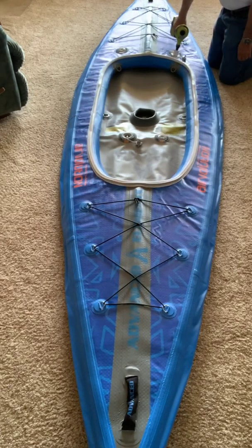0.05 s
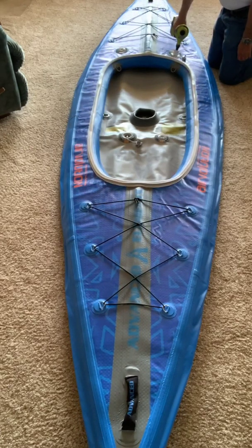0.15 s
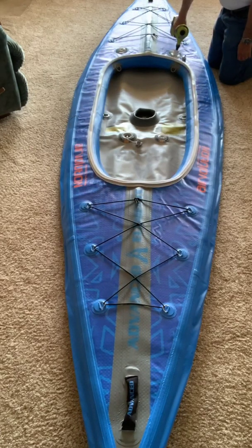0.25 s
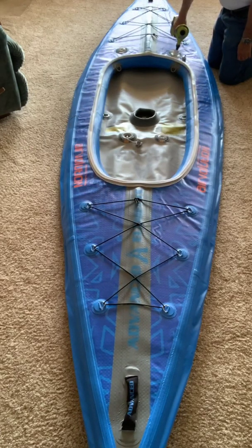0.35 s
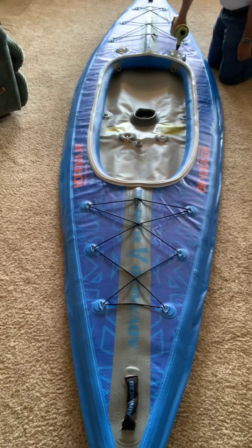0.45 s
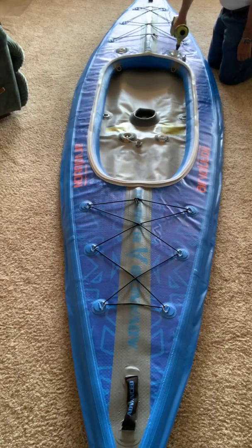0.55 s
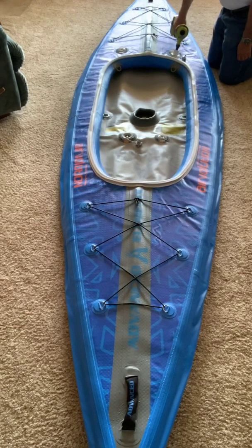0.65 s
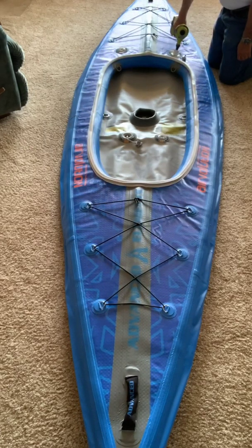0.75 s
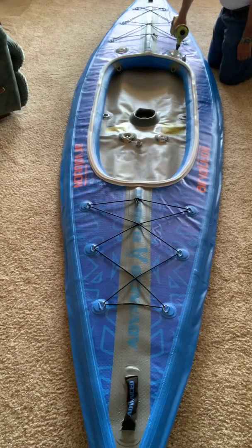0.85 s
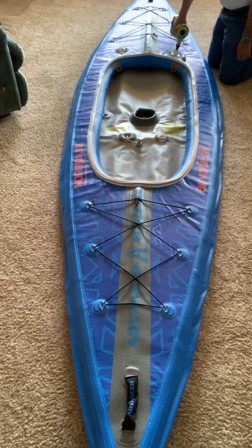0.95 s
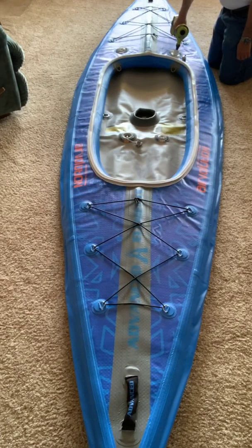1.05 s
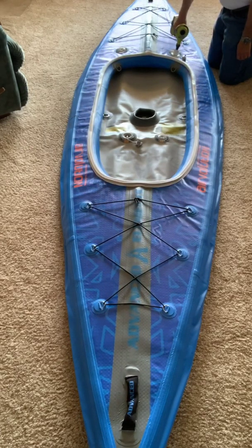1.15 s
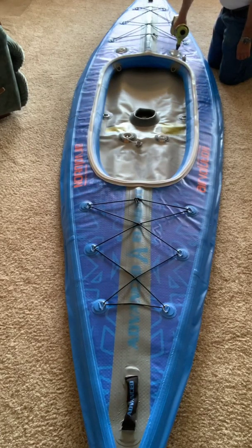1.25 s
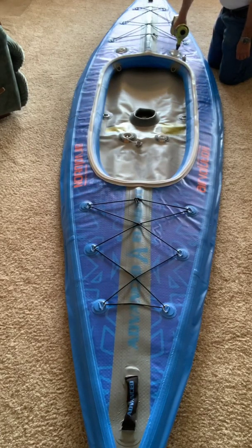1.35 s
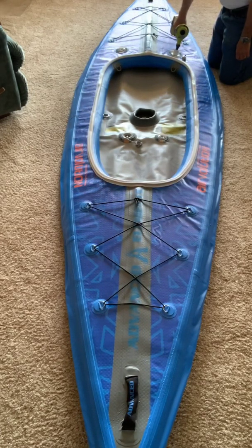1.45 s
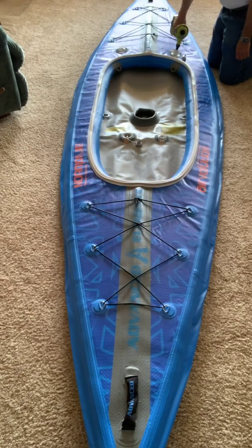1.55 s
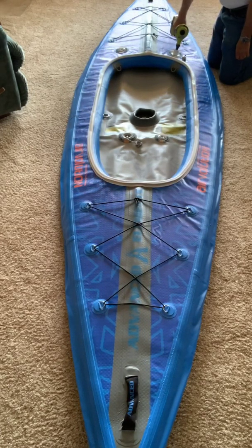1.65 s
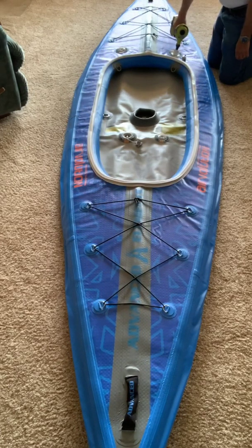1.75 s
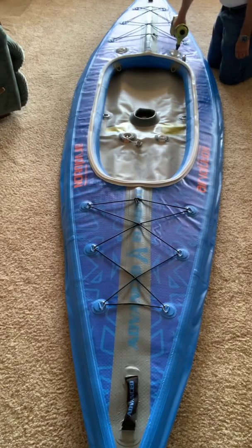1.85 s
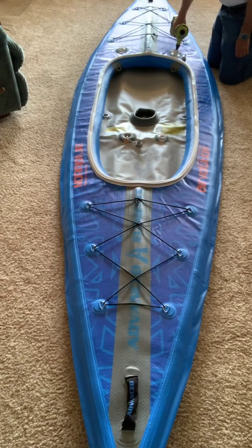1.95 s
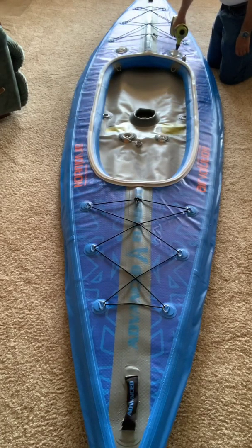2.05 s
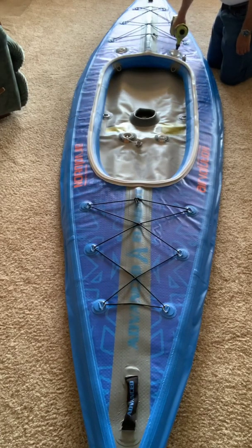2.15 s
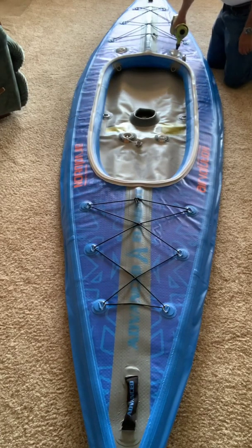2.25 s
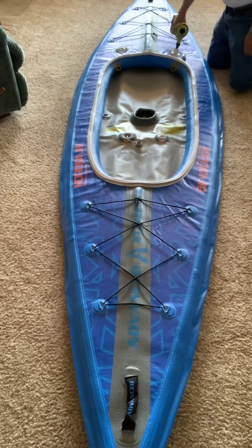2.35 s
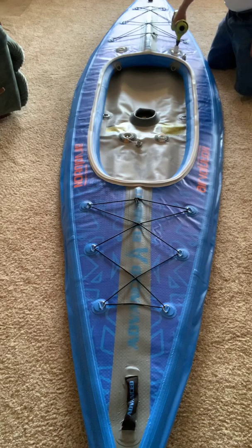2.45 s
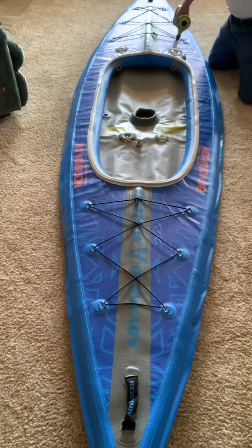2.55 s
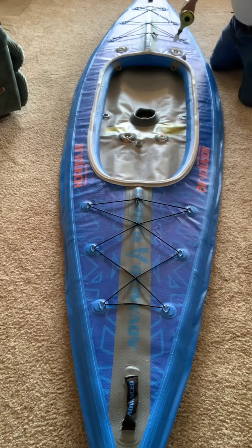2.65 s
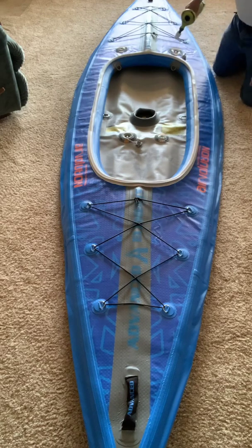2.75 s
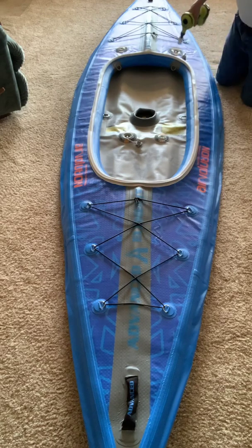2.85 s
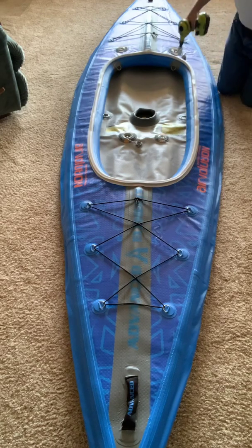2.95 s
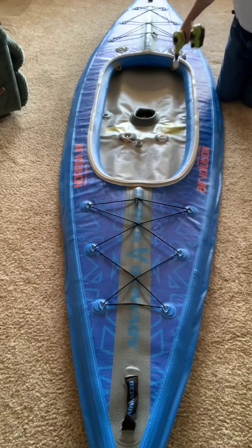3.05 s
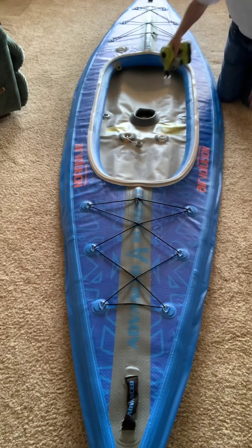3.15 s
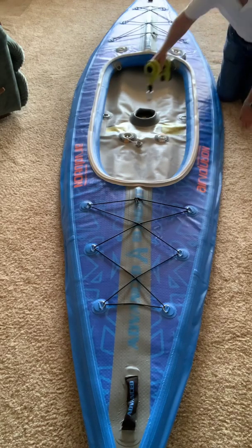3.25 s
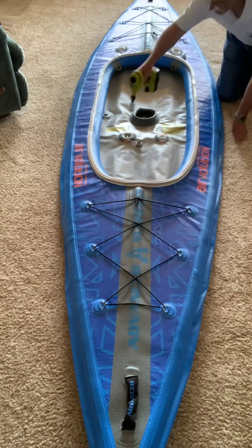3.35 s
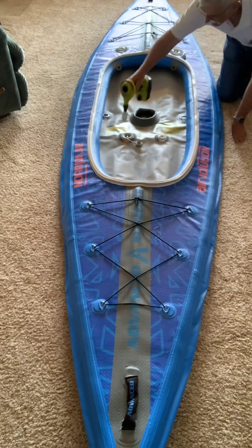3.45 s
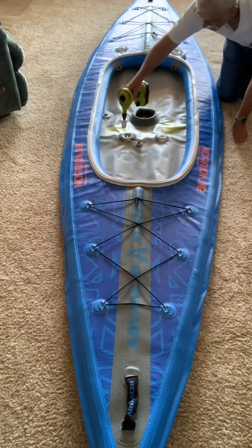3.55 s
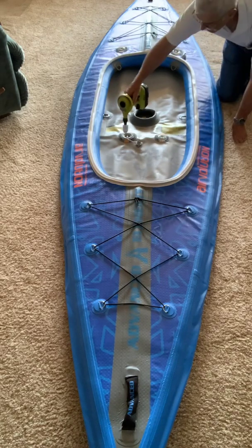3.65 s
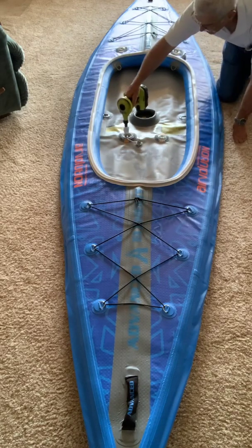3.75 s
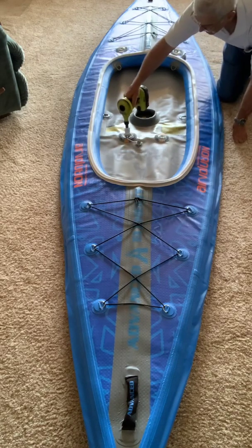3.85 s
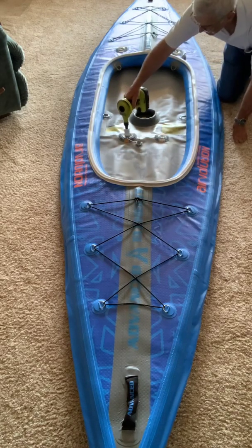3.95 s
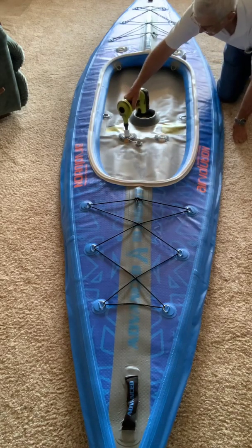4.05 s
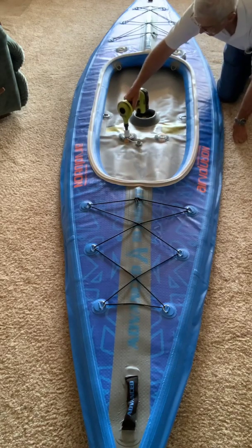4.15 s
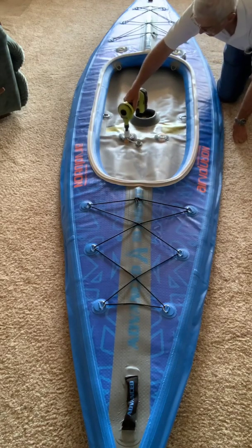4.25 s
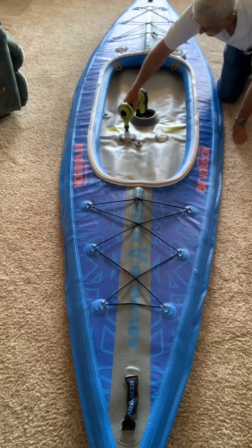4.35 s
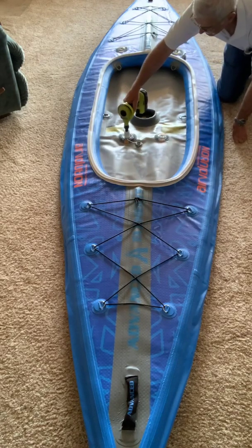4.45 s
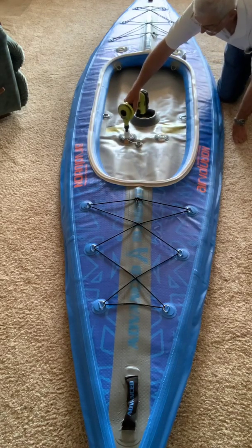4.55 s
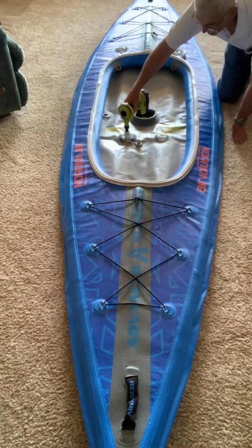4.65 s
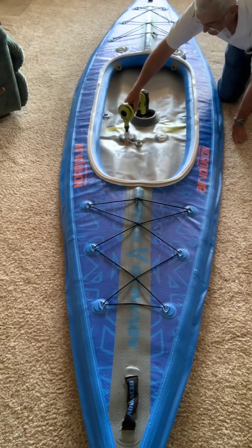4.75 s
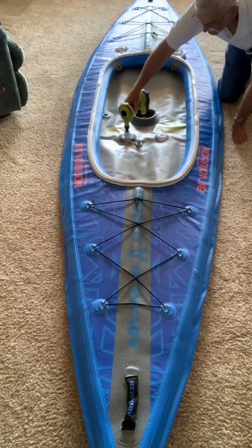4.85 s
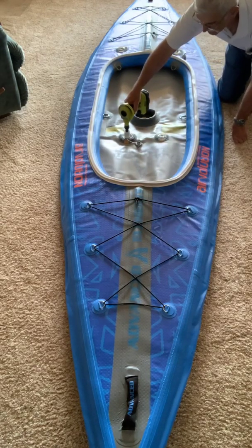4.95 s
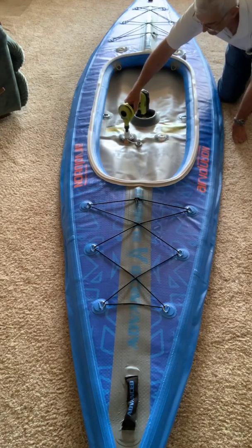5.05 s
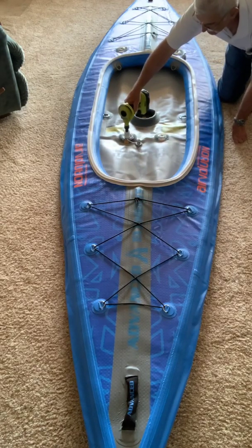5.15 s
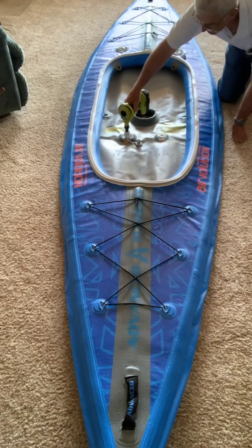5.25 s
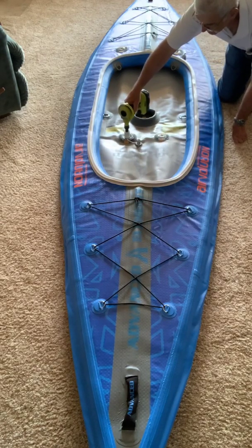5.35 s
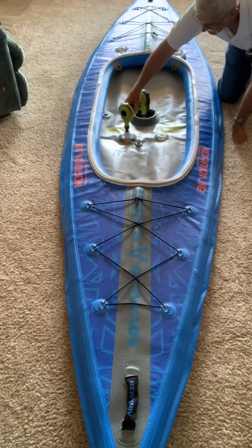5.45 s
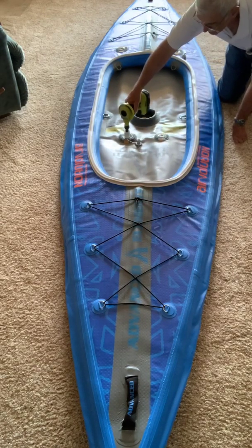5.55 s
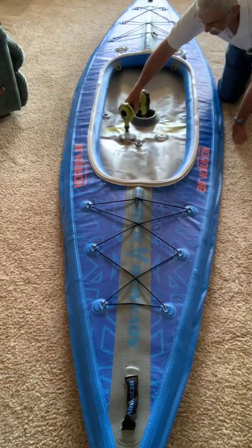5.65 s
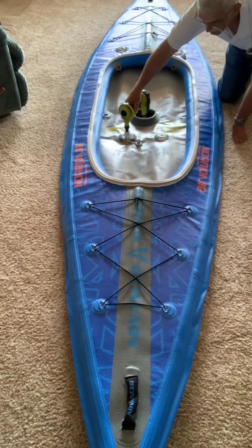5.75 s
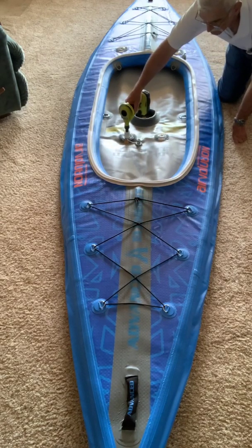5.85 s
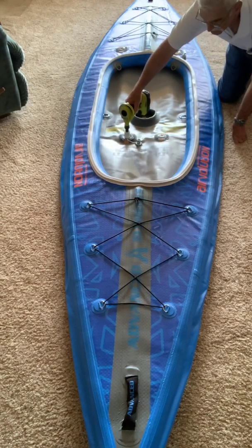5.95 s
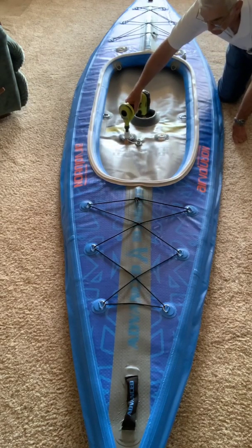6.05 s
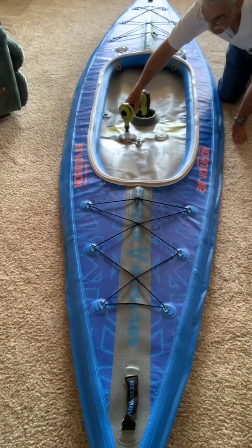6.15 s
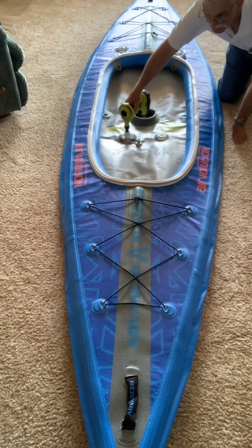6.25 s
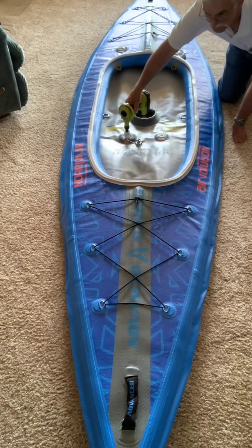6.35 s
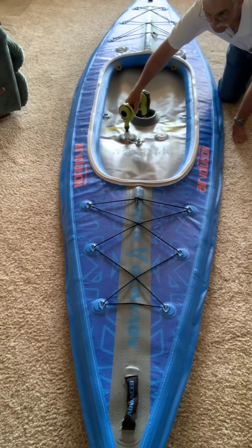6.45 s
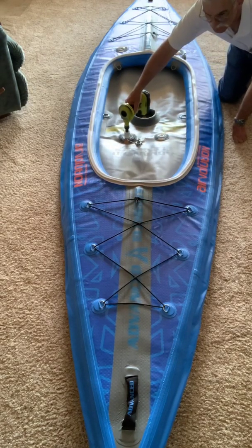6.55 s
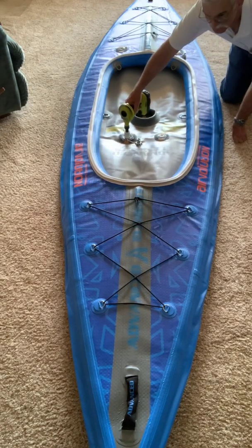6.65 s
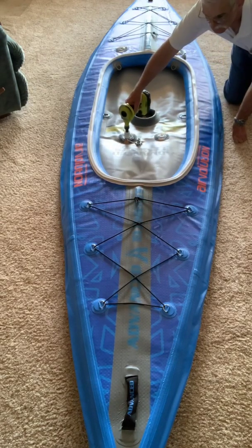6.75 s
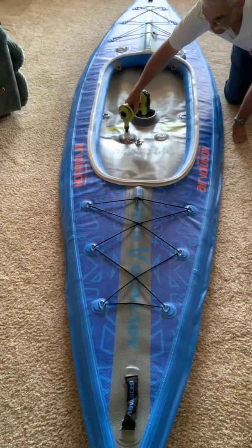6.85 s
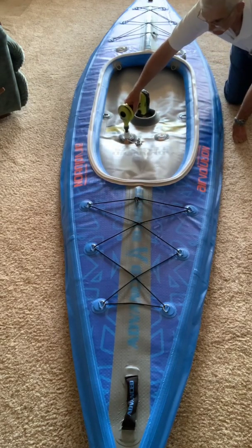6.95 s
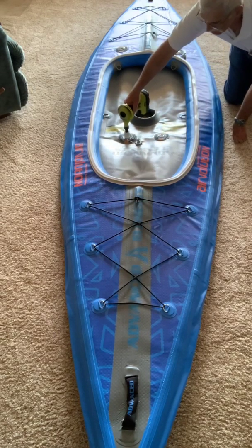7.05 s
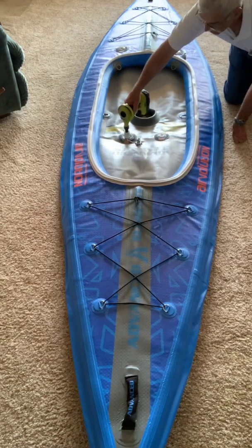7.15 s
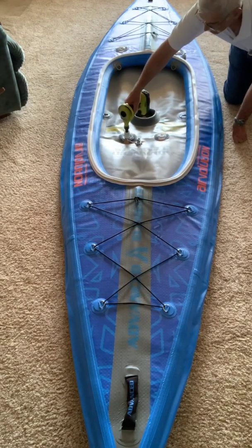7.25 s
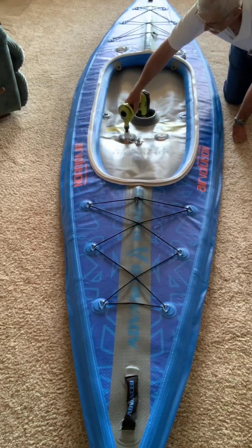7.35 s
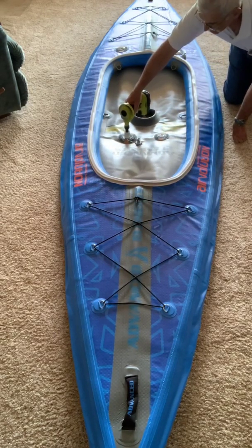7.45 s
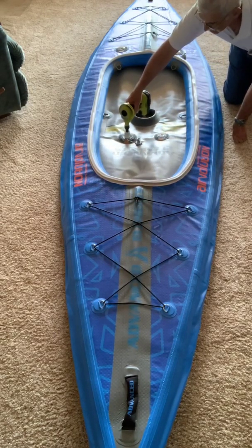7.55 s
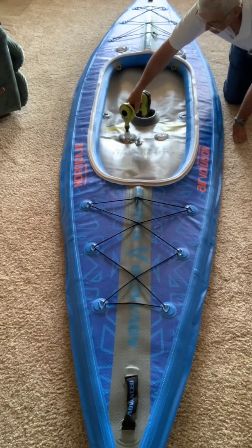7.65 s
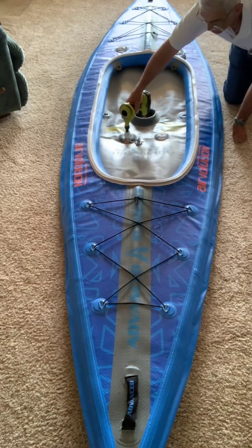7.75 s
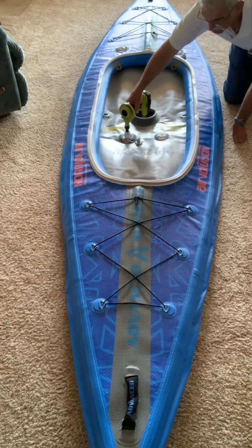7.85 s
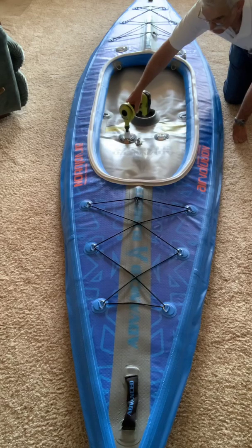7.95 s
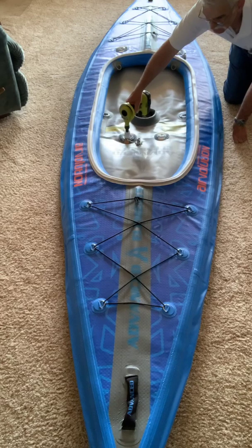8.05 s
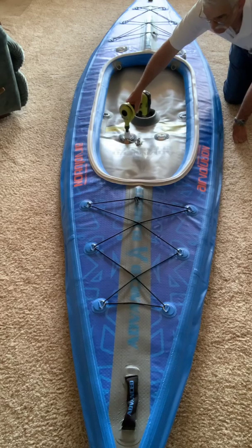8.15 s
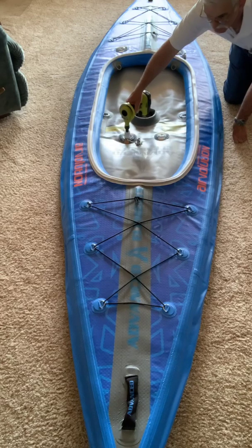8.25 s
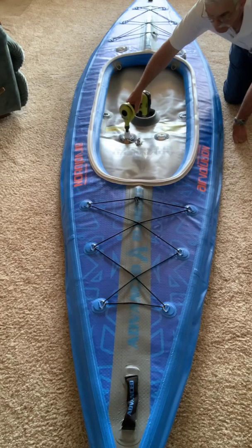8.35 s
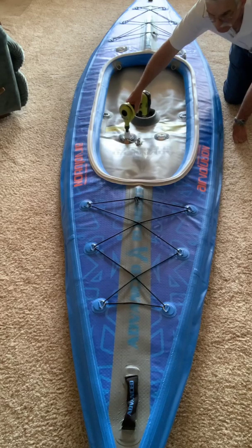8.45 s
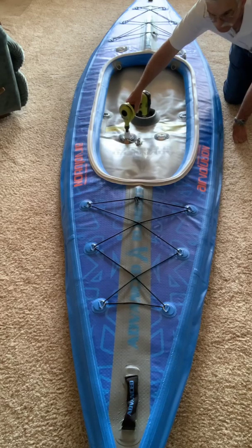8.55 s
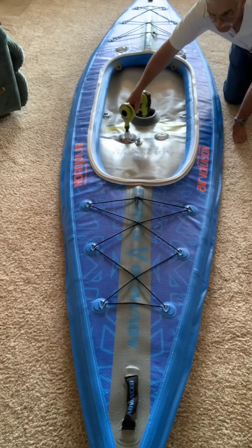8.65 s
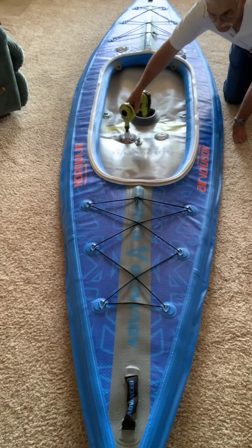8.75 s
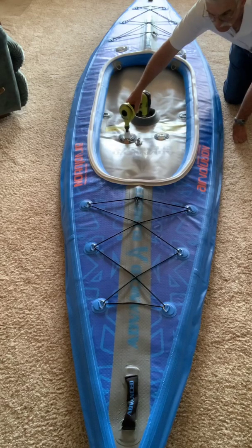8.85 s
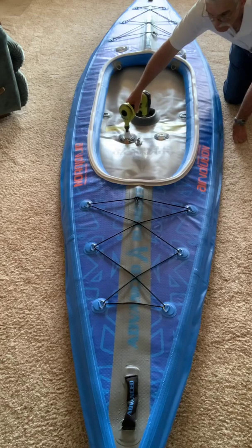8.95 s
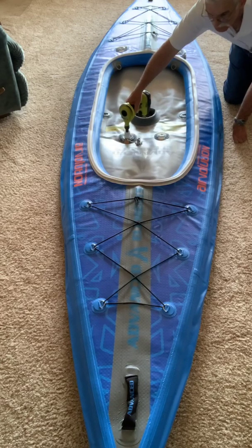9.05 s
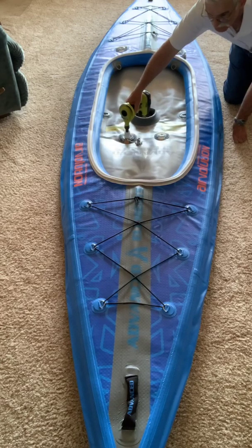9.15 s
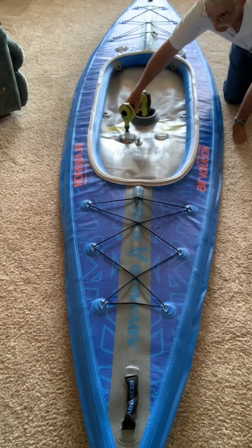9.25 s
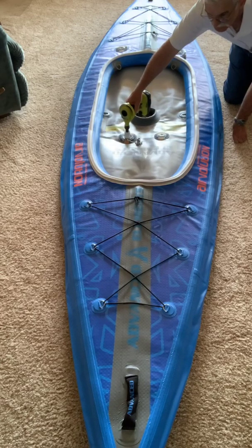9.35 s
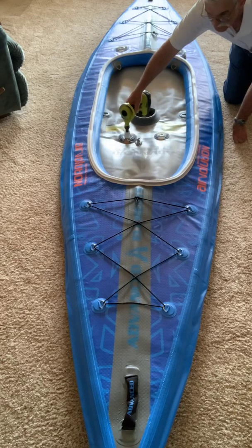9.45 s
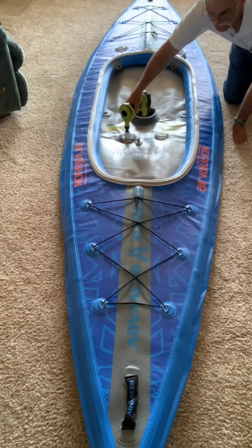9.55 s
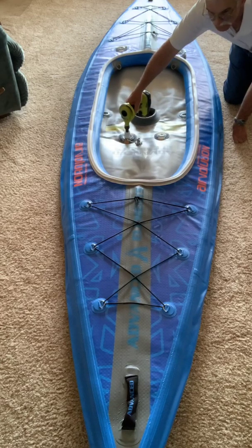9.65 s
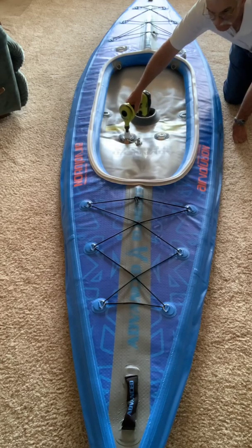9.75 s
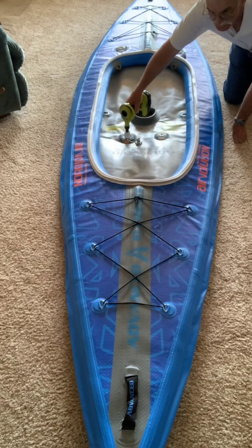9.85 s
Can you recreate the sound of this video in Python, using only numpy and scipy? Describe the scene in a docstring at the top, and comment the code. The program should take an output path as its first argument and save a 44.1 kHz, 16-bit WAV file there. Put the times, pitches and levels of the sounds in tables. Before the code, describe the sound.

A small electric pump whines high on an inflatable kayak, pops off with a puff, blows freely at lower pitch, then settles onto another valve.

```python
"""A pump's whine spins up first, over rushing air and a shaft hum, on the bow valve of an inflatable kayak.
The pump pulls off with a puff, slows and blows freely across the hull, then is pushed onto the floor valve.
Tones follow one shaft speed; filtered noise makes the air, gusts, whistle and rubs; damped swings make bumps.
Two close microphone ports hear it, with random echoes that shift as the pump moves."""
import sys
import numpy as np
from scipy import signal
from scipy.fft import rfft, irfft
from scipy.io import wavfile
from scipy.ndimage import uniform_filter1d

SR = 44100
rng = np.random.default_rng(int(sys.argv[2]) if len(sys.argv) > 2 else 0)


def output_pcm(signal):
    """Save a mono or channel-first signal as 16-bit PCM at the path in sys.argv[1].

    Samples are clipped to [-1, 1] before scaling.
    """
    pcm = np.clip(np.atleast_2d(signal).T, -1, 1) * 32767
    wavfile.write(sys.argv[1], SR, np.round(pcm).astype(np.int16))


N = 436590
TIME = np.arange(N) / SR
SOUND_M_PER_S = 343
BLADES, THIRD_ORDER, FIFTH_ORDER = 8, 3, 5  # multiples of the shaft speed
SHIFT_S = 6.45  # the grip shifts once on the floor valve and the intake turns

# where the blade tone arrives from as the pump is tilted: time_s, left_port_lag_rad
WHINE_DIRECTION = [(0, 0.96), (.8, 1.86), (1.2, 1.53), (1.75, 2.8), (1.95, 2.36), (2.1, 3), (2.26, 2.86),
                   (2.35, 0.4), (2.6, 1.63), (3.52, 1.07), (3.62, 2.86), (4.3, 0.89), (6.3, 1.97),
                   (7, 0.89), (8, 1.62), (9.9, 1.15)]
# strong tones come straight from the pump, weak ones mostly as echoes: peak_level_db, echo_to_direct_ratio
ECHO_BY_LEVEL = [(-51, 1), (-51.5, 0.24), (-30, 0.26)]


def tone_character(k, db, hz, t, glide):
    """Each tone's port lag (rad), left lean (dB), tremble and echo share; open air roughens most of them."""
    bow, free, floor = shares(t)
    beating = .73 * glide  # echoes of the older pitch beat with the direct tone while the speed changes
    lag, lean_db = spectrum(PORT_RESPONSE, hz, axis=2), 0
    shake = .19 + .28 * free + .38 * glide
    wet = curve(ECHO_BY_LEVEL, db.max()) + .99 * free + beating
    if k == 1:  # the shaft hum stays smooth; it leans left until the floor valve
        lag, lean_db = lag + .51 * bow, 4.5 * (1 - floor)
        shake, wet = .063 + .28 * free, .026 + .26 * free
    if k in (THIRD_ORDER, FIFTH_ORDER):
        shake, wet = .19, .12
    # the blade tone and its octave beam out of the intake, each in its own direction
    if k == BLADES:
        lag, wet = curve(WHINE_DIRECTION, t), .19 + .23 * free + beating
    if k == 2 * BLADES:
        lag, wet = .9 + .97 * floor * (t < SHIFT_S), .19 + beating
    if k in (BLADES, 2 * BLADES):  # both stay clean except while the speed changes
        shake = .085 + .2 * glide
    if k == BLADES + 1:
        shake, lag = .26 + .28 * free, np.full(len(t), 1.36)
    return lag, lean_db, shake, wet


def motor(jitter=0.00034, free_jitter=0.00091, echo_s=.04, held_m_per_s=0.051, carried_m_per_s=.7):
    """Every tone is a multiple of the shaft speed, whose jitter grows with the nozzle open."""
    t, shaft = TIME[::128], shaft_speed()
    speed = np.interp(t, TIME, shaft)
    uneven_shaft = shaft * (1 + (jitter + free_jitter * shares(TIME)[1]) * wander(48.0))
    turns = np.cumsum(uneven_shaft) / SR
    metres = np.cumsum(held_m_per_s + carried_m_per_s * shares(t)[1]) * t[1]
    glide = uniform_filter1d(abs(np.gradient(speed)), size=15)
    glide = glide / glide.max()  # 1 at the steepest speed change
    out = np.zeros((2, N))
    for k, db in tone_levels(t):
        hz = k * speed
        lag, lean_db, shake, wet = tone_character(k, db, hz, t, glide)
        travel = metres * hz.mean() / SOUND_M_PER_S + hz * echo_s  # wavelengths
        direct = np.array([np.ones(len(t)), np.exp(1j * lag)])
        room = port_pair(standing_waves(travel), standing_waves(travel), hz, lag)
        # eddies at the intake shake each tone on its own
        eddies = uniform_filter1d(rng.standard_normal(len(t)), size=6)
        tremble = 1 + shake * eddies / eddies.std()
        port_levels = amp([db + lean_db / 2, db - lean_db / 2])
        gains = port_levels * tremble * (direct + wet * room) * np.sqrt(2 / (1 + wet ** 2))
        tone = np.exp(2j * np.pi * (k * turns + rng.random()))
        out += [(np.interp(TIME, t, gain) * tone).real for gain in gains]
    return out


# blade tone, which swells and fades as the hand moves: time_s, level_db (before trim)
BLADE_WHINE = [(0.0, -47), (.06, -48), (0.1, -37.5), (.138, -34), (0.153, -45), (0.2, -31.5), (.26, -30.5),
               (0.385, -36), (0.46, -29), (.55, -35.5), (0.597, -43), (0.645, -28.5), (0.95, -26),
               (1.17, -28), (1.28, -24.5), (1.83, -34.5), (2.03, -25), (2.31, -32), (2.37, -28.5),
               (2.41, -29), (2.433, -32), (2.452, -31), (2.5, -35), (2.58, -33.5), (2.642, -39),
               (2.658, -28.5), (2.692, -25), (2.706, -46), (2.75, -31), (2.82, -24), (2.85, -39),
               (2.95, -44), (2.985, -34), (2.999, -52), (3.014, -33.5), (3.09, -39.5), (3.14, -35.5),
               (3.178, -48), (3.205, -28), (3.32, -30), (3.365, -36), (3.395, -27.5), (3.52, -24.5),
               (3.58, -38), (3.72, -34), (4.02, -37), (4.11, -47), (4.2, -41.5), (4.44, -43.5), (4.56, -47),
               (5.35, -48), (6.44, -41), (7.54, -43.5), (8.12, -40), (9.89, -48)]
# octave of the blade tone, loudest while the nozzle is open: time_s, level_db
BLADE_OCTAVE = [(0, -55), (.22, -51.5), (.4, -55.5), (1.3, -55.5), (1.6, -74), (2.44, -62), (2.49, -47),
                (2.55, -45), (2.61, -50), (2.68, -45), (2.796, -42), (2.852, -60), (2.89, -37),
                (2.945, -40), (2.965, -59), (3.0, -44), (3.068, -61), (3.14, -45), (3.19, -58),
                (3.215, -40.5), (3.33, -32.5), (3.43, -63), (3.498, -39), (3.612, -50), (3.74, -34),
                (3.86, -28.5), (3.925, -35), (3.955, -52), (3.985, -40), (4.02, -53), (4.8, -56),
                (9.9, -53.5)]
# second whine, one shaft multiple above the blade tone: time_s, level_db
SECOND_WHINE = [(0, -47), (.45, -51), (.76, -57), (.84, -48), (1.05, -44), (1.3, -48), (1.55, -44),
                (2.1, -51.5), (2.45, -44), (2.75, -52), (3.15, -47), (3.6, -55), (3.95, -49), (4.27, -51),
                (4.4, -50), (5, -50), (6.6, -52), (7, -49.5), (7.3, -51), (8.6, -46), (9.9, -47)]
# hum of the unbalanced shaft, radiated by the hull while the nozzle touches it;
# it stutters as the nozzle is worked loose: time_s, level_db
SHAFT_HUM = [(0, -38.5), (.13, -35), (.5, -43.5), (.95, -42.5), (1.3, -45.5), (1.64, -44), (1.7, -41.5),
             (2.15, -41.5), (2.335, -45.5), (2.36, -59), (2.395, -40), (2.437, -49), (2.46, -43),
             (2.53, -44), (2.555, -58), (2.59, -49.5), (2.85, -51.5), (2.98, -61), (3.1, -53), (4.0, -52.5),
             (4.238, -61), (4.255, -43), (6.5, -44), (7, -42.5), (9.9, -42)]
# third multiple, strong at first while the pump is pressed hard on the hull: time_s, level_db
THIRD_TONE = [(0, -49), (.28, -42), (.42, -54), (1.3, -57.5), (1.6, -55.5), (2.4, -52), (2.6, -60),
              (3.35, -62), (3.43, -46), (3.6, -52), (4.1, -57), (4.3, -50), (9.9, -48.5)]
# fifth multiple, which stands out while the pump is carried over the hull: time_s, level_db
FIFTH_TONE = [(0, -59), (.7, -50.5), (1.2, -57), (1.6, -51), (2.4, -55), (2.84, -55), (2.91, -45.5),
              (3.04, -41), (3.07, -52), (3.12, -46), (3.35, -48.5), (3.6, -54), (4.3, -59.5), (9.9, -58.5)]
# steady motor tones: shaft_multiple, bow_db, free_air_db, floor_db
MOTOR_TONES = [(2, -85, -65, -47), (4, -67, -62, -70), (6, -54.5, -64, -58.5), (7, -54.5, -49, -65.5),
               (10, -58, -62, -60), (11, -66, -67, -67), (12, -61, -65, -59), (13, -59, -71, -75.5),
               (14, -52.5, -72, -53.5), (15, -58, -57, -63), (17, -65, -62, -68), (18, -57.5, -71, -60.5),
               (19, -62.5, -75, -77), (20, -76, -78, -60), (22, -67, -77, -76), (23, -54, -68, -72),
               (24, -47, -52.5, -59.5), (25, -86, -70, -64), (26, -84, -73, -69), (28, -65, -75, -102),
               (29, -73, -80, -102), (30, -74, -78, -94), (31, -66, -70, -61), (32, -42, -46, -44.5),
               (33, -62, -52, -56.5), (34, -65, -74, -64), (35, -78, -77, -66), (36, -67, -85, -73),
               (38, -77, -80, -59), (39, -64, -73, -80), (40, -44.5, -52, -51.5), (41, -65, -66, -66),
               (48, -94, -52, -83)]
# tones that the turned intake brings out or hides: shaft_multiple, change_db
TURNED_TONES = [(2, -3), (6, 3.5), (24, 6), (25, -6), (26, -8), (33, 4.5), (35, -7)]


def tone_levels(t, turn_s=1.5, whine_trim_db=0.23):
    """Pairs each shaft multiple with its level over time (dB): the moving tones, then the steady ones."""
    turn = np.clip((t - SHIFT_S) / turn_s, 0, 1)
    turned = {k: change_db * turn for k, change_db in TURNED_TONES}
    moving = [
        (1, curve(SHAFT_HUM, t)),
        (THIRD_ORDER, curve(THIRD_TONE, t)),
        (FIFTH_ORDER, curve(FIFTH_TONE, t)),
        (BLADES, curve(BLADE_WHINE, t) + whine_trim_db),
        (BLADES + 1, curve(SECOND_WHINE, t)),
        (2 * BLADES, curve(BLADE_OCTAVE, t))]
    steady = [(k, np.array(db) @ shares(t) + turned.get(k, 0)) for k, *db in MOTOR_TONES]
    return moving + steady


# shaft speeds in turns per second: a valve chokes the flow and unloads the impeller; free air loads and slows it
START_HZ, BOW_HZ, FREE_HZ, FLOOR_HZ = 359.8, 369.4, 327.4, 332.7


def shaft_speed(spin_up_s=.68, inertia_s=.07, sag_hz_per_s=.03, shift_hz=.36):
    """The motor spins up, follows its load with inertia, sags as the battery drains and drops at the grip shift."""
    bow, free, floor = shares(TIME)
    spin_up = BOW_HZ + (START_HZ - BOW_HZ) * np.exp(-TIME / spin_up_s)
    sag = sag_hz_per_s * np.cumsum(floor) / SR + shift_hz * (TIME > SHIFT_S)
    aim = bow * spin_up + free * FREE_HZ + floor * (FLOOR_HZ - sag)
    keep = np.exp(-1 / (inertia_s * SR))
    return spin_up + signal.lfilter([1 - keep], [1, -keep], aim - spin_up)


# air rushing through the pump, before trim: freq_hz, bow_db_per_hz, free_air_db_per_hz, floor_db_per_hz
AIR_RUSH = [(30, -102.1, -101.7, -100.1), (70, -91, -94, -90.5), (149, -85.5, -82, -85),
            (242, -92.5, -89, -88.5), (527, -80.5, -79, -77.2), (650, -81, -79.5, -76.5),
            (1530, -81, -75.5, -77), (2480, -80, -69, -76.5), (3470, -78.5, -78.5, -80.5),
            (4280, -81, -72, -75), (5990, -84.5, -77, -86), (9500, -99.5, -96, -109.5),
            (10500, -112.5, -92, -102), (11700, -84, -86, -107), (13000, -89, -83, -87),
            (14800, -85, -86.5, -89)]
# resonances of housing and nozzle: centre_hz, width_hz, bow_db, free_air_db, floor_db
RESONANCES = [(156, 41, 4.5, 6, 6.5), (207, 39, -1, -17, -5), (657, 58, 5.5, -13, 2.5), (851, 42, 13, 8, 1),
              (922, 108, -12, -4, 0.5), (1197, 182, 12, 5.5, 5.5), (1885, 145, -2.5, -6.5, 4),
              (2220, 160, 2.5, -3, 0), (3560, 260, 9.5, 7.5, 2.5), (4770, 250, 7, -2, 4.5),
              (7780, 1300, 8.5, 7, 16)]
# by place (bow, free air, floor): unevenness of the air noise and depth of its comb
PATCHY_DB, RIPPLE_DB = (1.1, 1.6, .9), (2.2, 1.7, 1.3)


def air(air_trim_db=-1.5, swell_db=0.58, swell_hz=1.1, open_direct=0.35, flow_lag_s=.03, ripple_from_hz=500):
    """Turbulence in the pump's cavities, at the nozzle's edge and on the hull, shaped from noise."""
    noise = rng.standard_normal((2, N))
    hz, t, (one, other) = signal.stft(noise, SR, nperseg=1024, noverlap=768)
    colour = np.array([spectrum(AIR_RUSH, hz, axis=k) for k in (1, 2, 3)]).T
    for centre, width, *db in RESONANCES:
        colour = colour + np.outer(1 / (1 + (2 * (hz - centre) / width) ** 2), db)
    swell = swell_db * np.interp(t, TIME, wander(swell_hz))
    # the flow follows the nozzle a little late
    rush = amp(colour @ shares(t - flow_lag_s) + swell + air_trim_db)
    eddies = uniform_filter1d(rng.standard_normal(one.shape), size=12, axis=0)
    eddies = uniform_filter1d(eddies, size=10, axis=1)
    patches_db = np.array(PATCHY_DB) @ shares(t) * eddies / eddies.std()
    comb_db = np.array(RIPPLE_DB) @ shares(t) * ripple(t, hz) * (hz > ripple_from_hz)[:, None]
    size = np.sqrt((rush ** 2 + gusts(t, hz)) * SR / 2) * amp(patches_db + comb_db)
    hz = hz[:, None]
    lag, lean_db = spectrum(PORT_RESPONSE, hz, axis=2), spectrum(PORT_RESPONSE, hz, axis=3)
    ports = port_pair(one, other, hz, lag, open_direct * shares(t)[1])
    ports = ports * amp([lean_db / 2, -lean_db / 2])
    return signal.istft(ports * size, nperseg=1024, noverlap=768)[1][:, :N]


# the nozzle loosens, puffs free, nears the floor, spits into the new valve and leaks round it:
# full_s, attack_s, hold_s, release_s, edge_hiss_db, roar_db, roar_pitch_ratio, buffet_db (before trim)
AIR_GUSTS = [(2.41, 0.015, 0.13, 0.11, -0.5, -30, 0.91, -26), (2.46, .006, 0.051, .06, -5, -8, 1.9, -10),
             (3.75, 0.27, 0.19, 0.19, -1.5, -0.5, 1.19, 3), (3.798, 0.037, .03, .04, -20, 4.5, 1.26, -12),
             (3.924, 0.017, .03, .012, -17, -2, 4.6, -22), (4.183, 0.43, 1.03, 2, -10, -6.5, 1.05, -8.5)]
# edge hiss: freq_hz, level_db_per_hz (before each gust's level)
EDGE_HISS = [(100, -105), (900, -88), (2000, -76), (3800, -74), (6500, -77.5), (10500, -81.5), (13000, -84),
             (16000, -86)]
# roar of the jet: freq_hz, level_db_per_hz (before each gust's pitch and level)
JET_ROAR = [(130, -103), (420, -81.5), (620, -64.5), (780, -70), (1250, -76), (2000, -88), (4000, -92),
            (16000, -104)]
# jet buffeting the hull: freq_hz, level_db_per_hz (before each gust's level and trim)
HULL_BUFFET = [(30, -125), (90, -100), (130, -80.5), (260, -73.5), (420, -74.5), (800, -93), (3000, -120)]


def gusts(t, hz, buffet_trim_db=-4.0, lumpy_db=1.0, lumpy_hz=22.):
    """Power of the rushes over frequency and time: each builds, holds and dies away; on the hull it is lumpy."""
    power, lumps = 0, amp(lumpy_db * np.interp(t, TIME, wander(lumpy_hz)))
    for s, attack, hold, release, edge_db, jet_db, pitch, skin_db in AIR_GUSTS:
        build, decay = np.minimum(t - s, 0) / attack, np.maximum(t - s - hold, 0) / release
        shape = np.exp(build - decay)
        hiss = amp(spectrum(EDGE_HISS, hz) + edge_db)
        roar = amp(spectrum(JET_ROAR, hz / pitch) + jet_db)
        buffet = amp(spectrum(HULL_BUFFET, hz) + skin_db + buffet_trim_db)
        power = power + np.outer(hiss ** 2 + roar ** 2, shape ** 2)
        power = power + np.outer(buffet ** 2, (shape * lumps) ** 2)
    return power


def ripple(t, hz, held_m_per_s=0.0542, carried_m_per_s=0.593, count=10, detour_m=(.3, 2.8)):
    """Reflections off hull and floor comb the spectrum; the teeth slide as the pump moves (rms about 1)."""
    metres = np.cumsum(held_m_per_s + carried_m_per_s * shares(t)[1]) * t[1]
    comb = 0
    for detour, slant in zip(rng.uniform(*detour_m, count), rng.uniform(-1, 1, count)):
        extra_path = detour + slant * metres
        comb = comb + np.cos(2 * np.pi * np.outer(hz, extra_path) / SOUND_M_PER_S)
    return comb / np.sqrt(count / 2)


def whistle(hz=4030, width_hz=34, bow_db=-59, floor_db=-54.0, lag=1.5, swell_db=5.0, swell_hz=3.0):
    """Air squeezing through a valve excites a narrow, unsteady whistle that comes in swells."""
    bow, _, floor = shares(TIME)
    swell = amp(swell_db * np.tanh(wander(swell_hz)))
    level = (amp(bow_db) * bow + amp(floor_db) * floor) * swell
    unsteady = wander(width_hz) + 1j * wander(width_hz)
    tone = level * unsteady * np.exp(2j * np.pi * hz * TIME)
    return np.array([tone, tone * np.exp(1j * lag)]).real


# nozzle and hand bumping the air-filled hull: start_s, level_db, decay_s, centre_hz
HULL_BUMPS = [(2.443, -39.5, .014, 135), (2.47, -53, .07, 80), (3.285, -49, .025, 165),
              (3.47, -50, .02, 150), (3.922, -46, .025, 155), (4.002, -38.5, .018, 170),
              (4.066, -44, .025, 140), (4.252, -42.5, .019, 140)]


def bumps(rise_s=0.0015, spread=2.9, left_db=1.5):
    """Each bump is a soft thud of the hull: a damped swing and a dull rumble of the skin."""
    out, t = np.zeros(N), TIME[:SR // 2]
    for s, db, decay, hz in HULL_BUMPS:
        band = signal.butter(2, [hz / spread, hz * spread], "band", fs=SR, output="sos")
        rumble = signal.sosfilt(band, rng.standard_normal(SR))[-len(t):]
        thud = np.sin(2 * np.pi * hz * t) + .5 * rumble / rumble.std()
        envelope = (1 - np.exp(-t / rise_s)) * np.exp(-t / decay)
        out[round(s * SR):][:len(t)] += amp(db) * thud * envelope
    return out * amp([[left_db], [-left_db]])


# the nozzle scraping out of its valve, arm and knee brushing the hull: start_s, length_s, level_db, centre_hz
HULL_RUBS = [(2.438, 0.034, -48, 950), (2.475, 0.088, -42.5, 1630), (2.865, 0.067, -53, 356),
             (2.94, 0.03, -55, 386), (3.235, 0.051, -44, 520), (3.655, .045, -48, 190),
             (4.29, 0.16, -60, 200)]


def rustles(spread=1.47, grain_db=5.0, grain_hz=70., left_db=2.0):
    """A rub on the hull's skin is a short swell of dull noise that catches and slips."""
    out, slips = np.zeros(N), amp(grain_db * wander(grain_hz))
    for s, length, db, hz in HULL_RUBS:
        band = signal.butter(2, [hz / spread, hz * spread], "band", fs=SR, output="sos")
        rub = signal.sosfilt(band, rng.standard_normal(N) * slips)
        swell = np.sqrt(abs(np.sin(np.pi * np.clip((TIME - s) / length, 0, 1))))
        out += amp(db) * rub / rub.std() * swell
    return out * amp([[left_db], [-left_db]])


def standing_waves(travel, count=12):
    """Echoes from many directions add up to a gain that changes as the source travels (in wavelengths)."""
    slant, start = rng.uniform(-1, 1, (count, 1)), rng.random((count, 1))
    return np.exp(2j * np.pi * (slant * travel + start)).sum(0) / np.sqrt(count)


# the two microphone ports: freq_hz, likeness_0_to_1, left_lag_rad, left_minus_right_db
PORT_RESPONSE = [(60, 0.93, 0.5, 1), (160, 0.98, -0.08, 3.5), (403, 0.94, 1.23, 3.5), (740, 0.56, 1.07, 1),
                 (1190, 0.67, 1.17, -2), (2210, 0.79, 1.5, 0.5), (3000, 0.7, 1.52, -2), (4030, 0.39, 2, 0),
                 (4880, 0.57, 3.5, -1), (5820, 0.07, 5, 0.5), (6300, 0, 7.5, 2), (8130, 1, 8.5, 0),
                 (8700, 1, 9.3, 0), (10400, 1, 9.42, 0), (10700, 0.84, 10, 6), (12500, 1, 11, -4.5),
                 (14600, 0.94, 12.5, 4)]


def port_pair(one, other, hz, lag, direct=0):
    """Blends two unrelated signals into left and right: partly alike (more so for direct sound), left late."""
    same = np.clip(spectrum(PORT_RESPONSE, hz), 0, 1)
    same = same + (1 - same) * np.clip(direct, 0, 1)
    right = same * one + np.sqrt(np.maximum(1 - same ** 2, 0)) * other
    return np.array([one, right * np.exp(1j * lag)])


# path of the nozzle: time_s, place (0 bow valve, 1 free air, 2 floor valve)
NOZZLE_PATH = [(2.405, 0), (2.585, 1), (3.92, 1), (4.26, 2)]


def shares(t):
    """How much the pump sounds as on the bow valve, in free air and on the floor valve."""
    return np.maximum(1 - abs(curve(NOZZLE_PATH, t) - np.arange(3)[:, None]), 0)


def amp(db):
    """Decibels to gain."""
    return 10 ** (np.asarray(db) / 20)


def curve(rows, t=TIME, axis=1):
    """One column of a table, joined by straight lines along its first column."""
    rows = np.asarray(rows)
    return np.interp(t, rows[:, 0], rows[:, axis])


def spectrum(rows, hz, axis=1):
    """One column of a table, joined by straight lines in log frequency."""
    rows = np.asarray(rows)
    return np.interp(np.log(hz + 1), np.log(rows[:, 0] + 1), rows[:, axis])


def wander(hz):
    """Slow random drift of rms 1, with little above the given rate."""
    f = np.fft.rfftfreq(N, 1 / SR)
    x = irfft(rfft(rng.standard_normal(N)) / (1 + (f / hz) ** 4), N)
    return x / x.std()


def scene():
    """Motor, air, valve whistle and handling together."""
    return motor() + air() + whistle() + bumps() + rustles()


def record(dry, bass_hz=42., edge_hz=15780):
    """The microphone sheds the deepest bass; then the recorder's band limit."""
    thin = signal.sosfilt(signal.butter(2, bass_hz, "high", fs=SR, output="sos"), dry)
    band_limit = signal.firwin(511, edge_hz, window=("kaiser", 9), fs=SR)
    return signal.oaconvolve(thin, band_limit[None], "same")


dry = scene()
out = record(dry)
output_pcm(out)
```